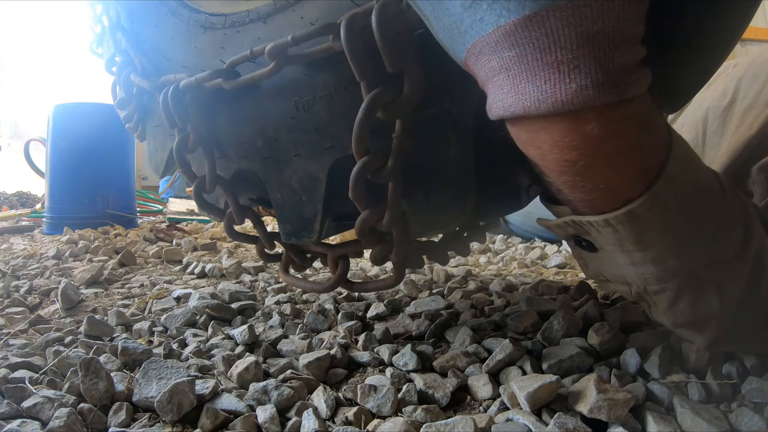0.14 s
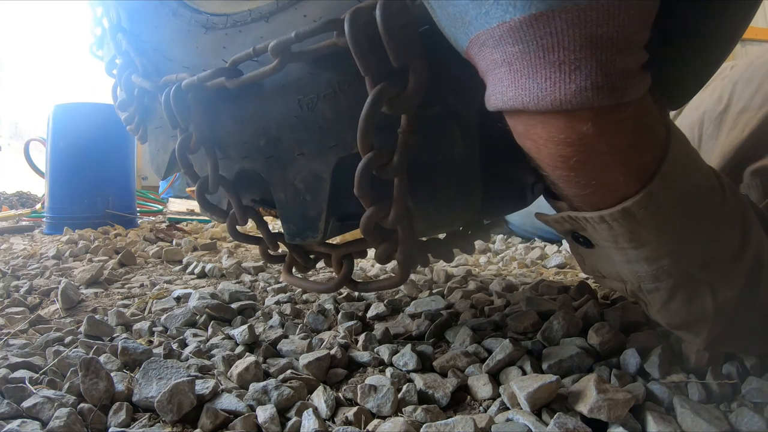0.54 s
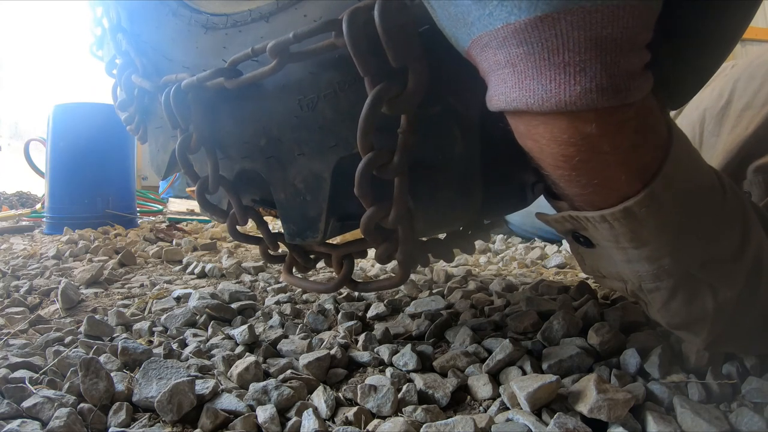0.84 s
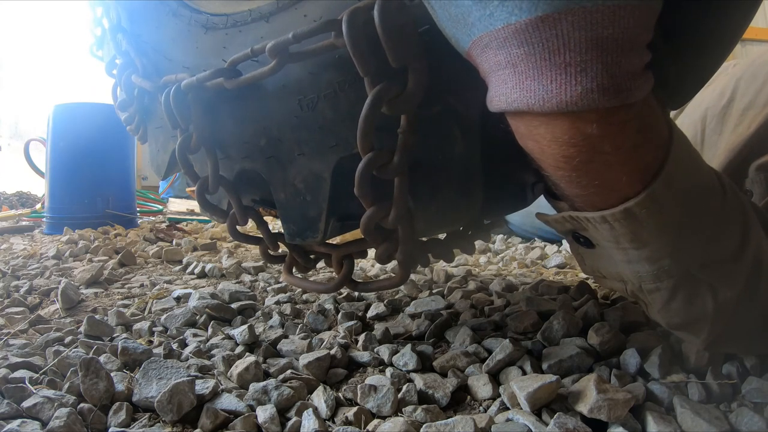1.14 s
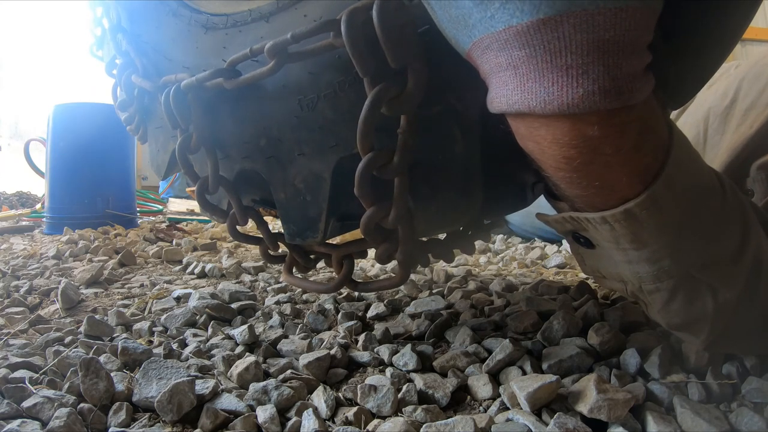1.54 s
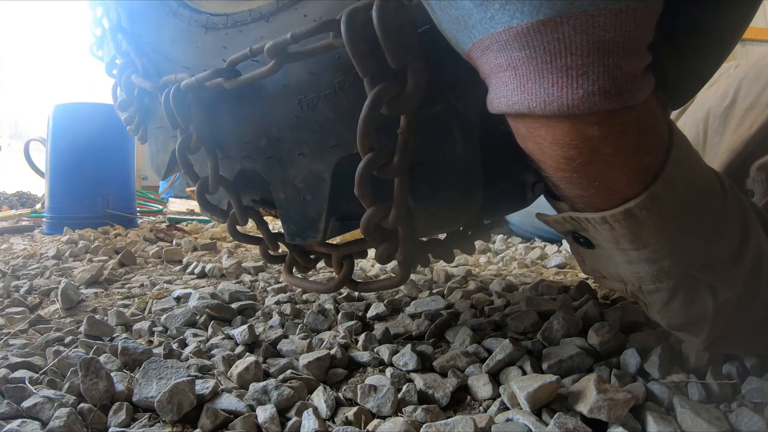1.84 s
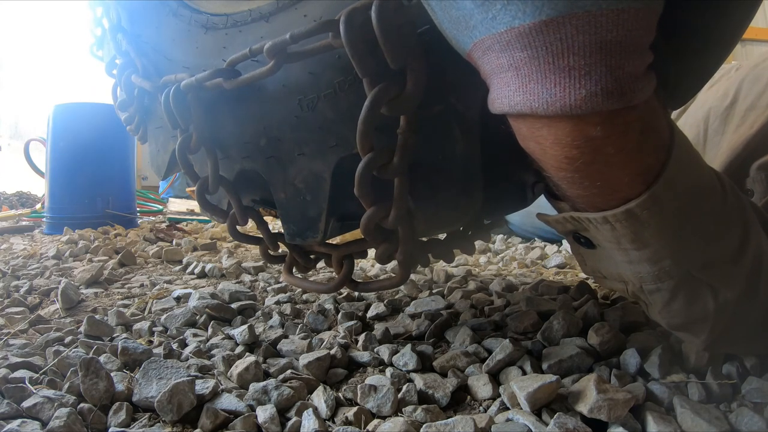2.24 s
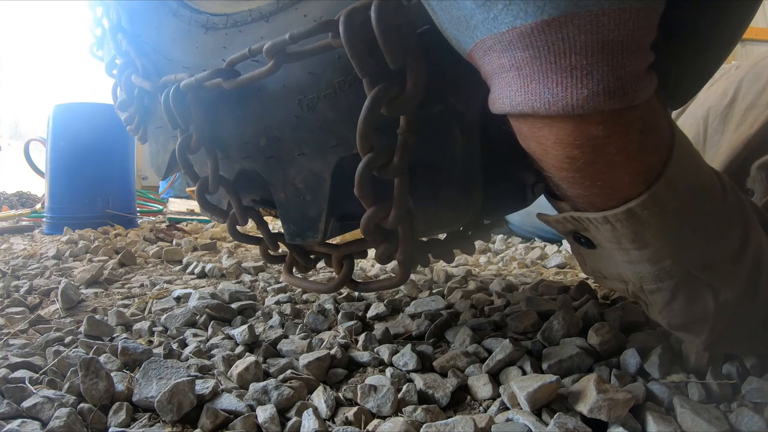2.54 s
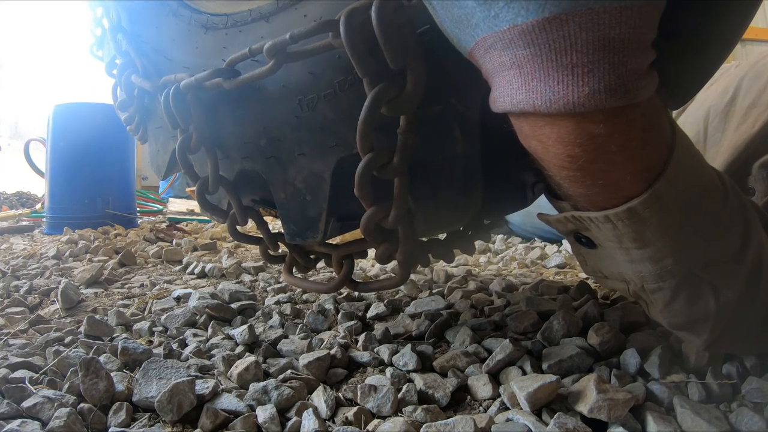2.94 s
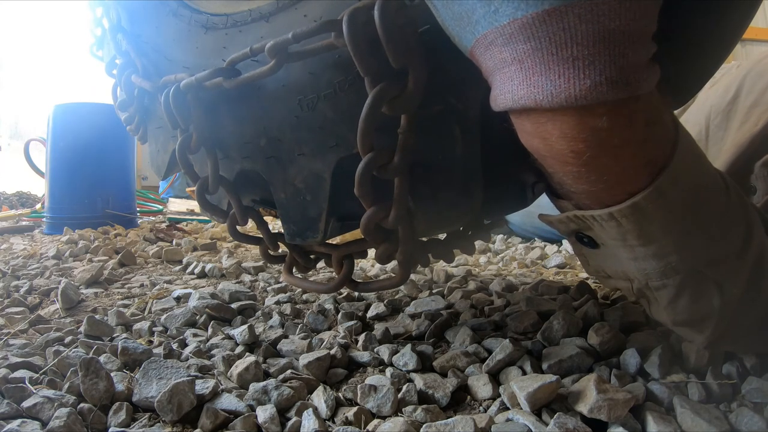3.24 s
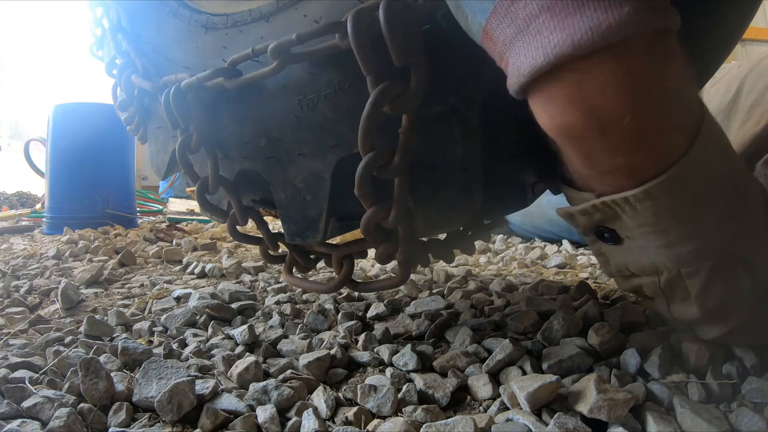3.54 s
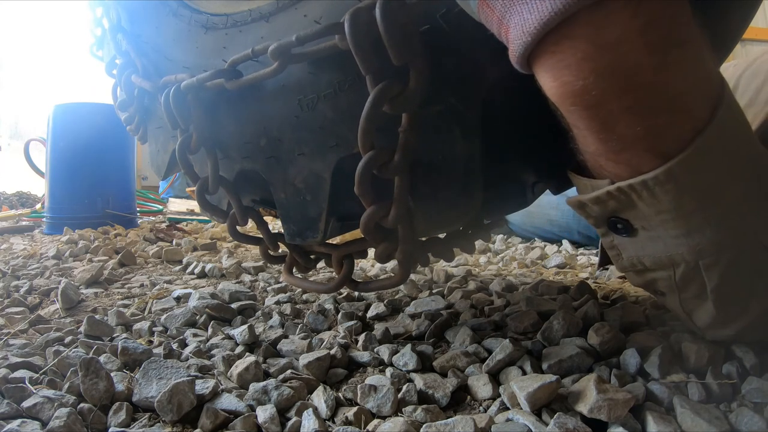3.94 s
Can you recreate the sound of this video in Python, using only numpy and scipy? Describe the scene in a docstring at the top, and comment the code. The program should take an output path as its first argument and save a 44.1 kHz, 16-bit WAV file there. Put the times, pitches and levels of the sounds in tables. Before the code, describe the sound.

A heavy steel chain is tugged over a tractor tyre, clinking brightly and rattling, with one loud ringing knock, then only dull rubbing and grit.

```python
"""A heavy steel chain, tugged by hand over a tractor tyre: links knock and ring in decaying modes.
Under the glove they jostle, random touches on short resonances; sliding, they sing in narrow modes fed by slips.
Chain on rubber, cloth and grit rub as banded noise and crackle; dry ticks are noise bursts.
A low outdoor rumble with a hum wavers underneath, as slowly varying noise, over a steady hiss.
Heard in stereo, close by, as from a small recorder lying on gravel."""
import sys
import numpy as np
from scipy import signal
from scipy.io import wavfile

SR = 44100
rng = np.random.default_rng(int(sys.argv[2]) if len(sys.argv) > 2 else 0)


def unload_audio(sound):
    """Save the sound as a 16-bit wav file, at the path given as the first command line argument."""
    columns = np.transpose(np.atleast_2d(sound))
    # keep every value between -1 and 1, then stretch to whole-number steps
    steps = np.round(np.clip(columns, -1, 1) * 32767)
    wavfile.write(sys.argv[1], SR, steps.astype(np.int16))


N = 180750

# Link on link. Each row: start in seconds, drive in dB of free ring, short clink, upper clink, low clink,
# dull knock and deep ring, pitch of the pinched link in Hz, seconds until a touch chokes the ring, left-right in dB.
KNOCK_EVENTS = [(0.4347, -34.5, -48, -38, -58, -48, -60, 7150, 0.12, 3),
                (0.4679, -42, -53, -41, -70, -56, -59, 7150, 0.092, 6),
                (0.5086, -38, -54, -52, -63, -47, -60, 7240, 0.15, 2),
                (0.7428, -36, -43, -53, -55, -43, -47, 7150, 0.069, 0.1),
                (0.793, -20, -16.5, -16.5, -37, -22.5, -56, 7150, 0.076, 4.5),
                (0.797, -29, -17, -23, -30, -36, -51, 7040, 0.11, -4.5),
                (0.9336, -23, -29, -25, -55, -33, -55, 7240, 0.073, 6.5),
                (1.004, -30, -45, -57, -75, -60, -65, 7100, 0.18, 4),
                (1.4763, -8.5, -10.5, -25, -23, -20, -31, 7096, 0.11, 2),
                (1.6221, -57, -36, -30, -21, -29.5, -50, 7010, 0.14, -1),
                (1.7566, -47.5, -41, -50, -57, -42, -65, 7080, 0.11, 2),
                (1.8636, -26, -40, -40, -58, -43, -65, 7150, 0.064, 0),
                (1.9619, -33.5, -34.5, -48, -59, -44, -53, 6950, 0.02, 8),
                (2.0593, -29, -43, -36, -38.5, -33.5, -53, 7120, 0.031, 1),
                (2.089, -53, -44, -60, -39, -50, -60, 7150, 0.04, 0.1),
                (2.2456, -57, -51, -56, -50, -52, -74, 7160, 0.1, 0),
                (2.3201, -37, -45, -52, -45, -44, -44.5, 7100, 0.088, 3),
                (2.361, -38, -33, -42, -60, -52, -65, 7150, 0.05, 1.5),
                (2.3785, -22, -12, -25, -46, -33, -60, 7140, 0.05, 2),
                (2.529, -34.5, -60, -57, -78, -65, -74, 7300, 0.035, 3),
                (2.539, -38.5, -37.5, -53, -63, -65, -68, 7080, 0.06, 0.5),
                (2.6984, -55, -42, -56, -61.5, -52, -75, 7200, 0.11, 2),
                (2.765, -67, -55, -50, -58, -57, -76, 7240, 0.1, 0.1),
                (3.1375, -61, -50, -45, -54.5, -47.5, -76, 7300, 0.1, 2.5),
                (3.1686, -55, -46, -46, -65, -48, -64, 7150, 0.11, 7),
                (3.1898, -59, -52, -42.5, -51, -41.5, -65, 7300, 0.091, 3),
                (3.2461, -72, -56, -44, -69, -34, -63, 7230, 0.11, 1),
                (3.2855, -55, -52, -48, -52, -43, -69, 7300, 0.12, 3),
                (3.501, -44, -45, -49, -57, -42, -66, 7300, 0.13, -4.5),
                (3.934, -49, -35, -40, -46, -25, -68, 7400, 0.11, 4),
                (3.989, -45, -44, -43, -62, -47, -64, 7200, 0.1, 6)]
# Link modes, a list for each family: free ring, short, second, upper, low and top clink, dull knock,
# deep ring. Each entry: frequency in Hz.
LINK_MODES_HZ = [
    [6950, 7020],
    [7150, 7260],
    [7330, 7385, 7610],
    [7790, 8020, 8393],
    [4780, 4530],
    [10550, 11130, 12800, 13430, 14290],
    [1400, 1950, 2600, 3150, 3480],
    [2780],
]
# The same modes. Each row: level in dB, undamped t60 in seconds.
LINK_MODES = [
    [(-1, 0.22), (-18.5, .15)],
    [(4.5, 0.075), (-13, 0.12)],
    [(0, 0.057), (-10, 0.1), (-10, 0.086)],
    [(0, 0.12), (-6, 0.11), (-19, 0.29)],
    [(1.5, 0.1), (-11.5, .12)],
    [(-2, 0.15), (-16, 0.046), (-15, .1), (-12, .09), (-20, .12)],
    [(-0.5, 0.0071), (-16, 0.0037), (-5.5, 0.053), (-9.5, 0.041), (-0.5, 0.023)],
    [(-9, 0.5)],
]
# Pitch spread between links. Each entry, one a family: share of the frequency.
PITCH_SPREAD = [.001, .001, .003, .002, .004, .002, .035, .002]
# Drive of each family. Each entry: index of the drive column in KNOCK_EVENTS, from 0 = free ring.
DRIVE_COLUMN = [0, 1, 2, 2, 3, 1, 4, 5]
# Family level against its drive. Each entry: level in dB.
FAMILY_LEVEL_DB = [0, 0, 1.5, -2.5, 0, -24, 0, 0]
# Stereo phase. Each row: frequency in Hz, lead of the left port in radians.
LEFT_LEAD = [(1500, 0.098), (4700, .2), (6900, 0.43), (8000, 1.7), (12000, 2.2)]
# Links under the glove. Each entry: mode frequency in Hz.
JOSTLE_MODES_HZ = [7080, 7300, 7600]
# Modes sung by sliding links. Each entry: frequency in Hz.
SUNG_MODES_HZ = [6940, 7770, 8390, 12800, 14270]
# The same modes. Each row: level in dB, t60 in seconds.
SUNG_MODES = [(2, 0.1), (2.5, 0.33), (0.5, 0.14), (-32, 0.083), (-34, 0.069)]
# Sliding. Each row: time in seconds, levels in dB of the first, second and third sung mode.
SING_LEVELS = [(0.0, -80, -80, -88), (0.22, -67, -92, -90), (0.366, -51.5, -74, -55),
               (0.48, -47.5, -42, -74), (0.56, -44.5, -63, -76), (0.67, -45, -61, -67),
               (0.76, -48, -68, -64), (0.82, -58, -68, -56), (0.885, -33, -62, -53), (0.91, -50, -57, -65),
               (1.1, -63, -73, -81), (1.168, -53, -67, -71), (1.252, -61, -66, -76), (1.33, -48, -66, -62),
               (1.44, -50, -63, -60.5), (1.52, -65, -78, -80), (1.64, -46, -54, -70), (1.69, -77, -95, -98),
               (1.8, -62, -72, -82), (1.88, -44, -57, -58), (1.996, -52, -61, -68),
               (2.074, -45.5, -57, -68), (2.168, -65, -80, -92), (2.335, -53.5, -50, -62),
               (2.44, -56, -70, -72), (2.5, -88, -90, -98), (2.574, -47.5, -74, -69), (2.78, -68, -68, -81),
               (2.84, -90, -98, -100), (4.1, -110, -120, -120)]
# Rubbing strokes. Each row: peak in seconds, rise over the last 10 dB in seconds, fall by 10 dB in seconds,
# chain on rubber in dB, cloth in dB, bright grit (before its top is thinned) in dB.
RUB_STROKES = [(0.17, .3, .06, -58, -63, -57), (0.425, .08, .06, -47, -52, -47),
               (0.53, .04, 0.0357, -50, -61, -47), (0.64, .06, .09, -45, -52, -44),
               (0.775, .025, .012, -44, -51, -41), (0.903, .025, .014, -47.5, -50.5, -45.5),
               (0.96, .015, .08, -56, -63, -54), (1.148, .3, .016, -54, -63, -53),
               (1.202, .016, .02, -55.5, -65, -56), (1.33, .035, .035, -47, -54, -46.5),
               (1.44, .04, .018, -55.5, -53.5, -59), (1.497, .012, .007, -47, -65, -46),
               (1.558, .06, .025, -62, -65, -63), (1.635, .025, .015, -54, -56, -48),
               (1.74, .06, .08, -53.5, -65.5, -55), (1.866, .035, .02, -47, -59, -50.5),
               (1.934, .024, .012, -50, -62, -49.5), (1.962, .008, 0, -49.5, -47.5, -52.5),
               (2.068, .05, .11, -53, -67, -53), (2.35, .2, .03, -58.5, -57, -54),
               (2.39, .02, .012, -45.5, -53, -38), (2.442, .03, .013, -54, -54, -44),
               (2.56, .035, .3, -61, -64, -60), (2.704, .08, 0.016, -59, -63, -53),
               (2.85, .2, .1, -71, -71, -62.5), (2.974, .025, .025, -57.5, -62, -56),
               (3.195, .055, .02, -61.5, -60, -66), (3.248, .007, .08, -58.5, -58, -56),
               (3.34, .025, .028, -57, -52, -55), (3.48, .045, .2, -56, -53.5, -53),
               (3.645, .1, .025, -53, -60, -53), (3.93, .4, .3, -56, -53.5, -49),
               (3.936, .012, .02, -48, -47, -45), (4.088, .008, .008, -53, -56, -49)]
# Chain on rubber. Each row: frequency in Hz, relative density in dB per Hz.
DRAG_SPECTRUM = [(1060, -40.5), (1800, -8), (1950, 0.5), (2110, -10.5), (2720, 1.5), (4800, -12),
                 (6240, -55), (10600, -120)]
# A link slips on rubber or grit cracks. Each row: start in seconds, level in dB, body frequency in Hz.
TICK_EVENTS = [(0.584, -44, 2830), (0.605, -30, 2880), (0.615, -37, 1690), (0.625, -31, 2900),
               (0.66, -27, 3120), (0.709, -34, 2680), (0.899, -37, 2100), (0.976, -37, 3230),
               (1.15, -35.5, 1990), (1.204, -47.5, 1870), (1.312, -42, 2560), (1.917, -34, 2580),
               (1.93, -33, 3220), (2.185, -53, 960), (2.284, -36.5, 1810), (2.358, -33.5, 1290),
               (2.362, -30, 3630), (2.422, -40, 3500), (2.437, -40.5, 1910), (2.445, -39, 3500),
               (2.559, -42, 1790), (2.677, -40, 3530), (2.974, -49, 1300), (3.334, -36.5, 1940),
               (3.343, -37, 2140), (3.686, -47, 860), (3.722, -41, 1290), (3.896, -43, 1480),
               (4.048, -43.5, 1460), (4.082, -40.5, 3070)]
# Sleeve and glove. Each row: frequency in Hz, relative density in dB per Hz.
CLOTH_SPECTRUM = [(260, -45), (450, -15.5), (874, -3.5), (959, -9), (1310, 2), (2200, -8.5), (2860, -15.5),
                  (4840, -120)]
# Bright grit. Each row: frequency in Hz, relative density in dB per Hz.
GRIT_SPECTRUM = [(2650, -37.5), (4500, -5.5), (5420, -15), (6090, -3), (7570, 2.5), (8290, -9), (8880, -12),
                 (9870, -9.5), (11400, -32), (13900, -41), (14800, -33), (15500, -56), (16000, -59)]
# Outdoor rumble. Each row: frequency in Hz, relative density in dB per Hz.
RUMBLE_SPECTRUM = [(13, -58.5), (22, -33), (91, 0.5), (124, -5.5), (178, 0.5), (198, -3.5), (248, -6.5),
                   (300, -10.5), (340, -20), (600, -34.5), (780, -56), (1320, -120)]
# Rumble level. Each row: time in seconds, level in dB.
RUMBLE_SWELL = [(0.0, -54), (0.11, -50.5), (0.78, -52.5), (1.07, -60), (1.19, -51.5), (1.3, -56.5),
                (1.49, -53.5), (1.6, -60), (1.88, -60), (1.96, -57), (2.86, -54.5), (2.97, -58.5),
                (3.32, -52.5), (3.6, -53.5), (3.95, -51.5), (4.1, -54.5)]
# Deep thuds of the tyre as the chain is tugged. Each row: peak in seconds, rise over the last 10 dB in seconds,
# fall by 10 dB in seconds, level in dB.
DEEP_HEAVES = [(0.01, 0.08, .06, -42.5), (0.79, .05, .12, -43), (1.48, .07, .04, -46.5),
               (1.95, 0.1, .13, -54.5), (2.43, .09, .4, -48), (3.32, .3, .2, -50.5), (3.85, .08, 0.02, -47),
               (4.09, 0.1, .08, -42.5)]
# Hum inside the rumble. Each row: frequency in Hz, width in Hz, mean level against the rumble in dB.
HUM_LUMPS = [(157.4, 11, -5.5), (188.3, 17, -7)]
# Steady hiss. Each row: frequency in Hz, relative density in dB per Hz.
AIR_SPECTRUM = [(240, -32), (400, 5.5), (503, -18.5), (847, -6.5), (1660, -30.5), (3210, -10),
                (6580, -36.5), (15500, -70)]
# Stereo likeness of banded noise. Each row: frequency in Hz, left-right correlation.
STEREO_LIKENESS = [(60, 0.89), (130, 0.92), (290, 0.92), (640, 0.064), (1410, 0.39), (3100, 0.86),
                   (6820, 0.42), (15000, 0.09)]

GRIP_S = 3.0   # from here the glove holds the links and they barely ring
GRIP_DECAY_SHARE, GRIP_SNAP_DB = 0.3, -7   # the glove softens the snap too
TYRE_DECAY_SHARE = 0.64   # of the free decay time, for links lying on the tyre
SNAP_DB, CHINK_DB = -2, -6.5   # snap against dull knock, chink against upper clink
JOSTLE_T60_S, JOSTLE_DB = 0.012, -7   # level against the grit
EDGE_DB, TICK_PAN_DB = -15, -1.2   # mean bright edge against the body, mean left-right
DEEP_DB, AIR_DB = -66, -67   # deepest rumble between tyre thuds, hiss
CUTOFF_HZ = 16600


def knocks():
    """Each knock sets all link modes ringing, family by family, until a neighbouring link chokes them."""
    out = np.zeros((2, N))
    t = np.arange(int(0.25 * SR)) / SR
    family = np.concatenate([[k] * len(modes) for k, modes in enumerate(LINK_MODES)])[:, None]
    mode_hz = np.concatenate(LINK_MODES_HZ)[:, None]
    mode_db, t60_s = np.concatenate(LINK_MODES).T[:, :, None]
    chance = rng.standard_normal((len(KNOCK_EVENTS), 3, len(family), 1))
    rattle = drift(54.0)
    attack = np.sin(np.pi / 2 * np.minimum(t / 0.00076, 1)) ** 2
    for (s, *drive_db, short_hz, held_s, pan_db), (detune, strength, lag) in zip(KNOCK_EVENTS, chance):
        gripped = s > GRIP_S
        hz = mode_hz * (1 + np.array(PITCH_SPREAD)[family] * detune)
        # the pinched link sets its own pitch
        hz = hz * np.where(family == 1, short_hz / LINK_MODES_HZ[1][0], 1)

        family_db = np.array(drive_db)[DRIVE_COLUMN] + FAMILY_LEVEL_DB
        level_db = family_db[family] + mode_db + 1.7 * strength * (family > 1)
        # the free ring hangs clear of the tyre
        decay_share = np.where(family > 0, TYRE_DECAY_SHARE, 1)
        decay_share = decay_share * (GRIP_DECAY_SHARE if gripped else 1)
        decay = from_db(-60 * t / (t60_s * decay_share))

        # loose neighbours make each ring but the free one flutter
        rattle_at = rng.integers(0, N - len(t), family.shape) + np.arange(len(t))
        chatter = from_db(3.0 * (family > 0) * rattle[rattle_at])
        choke = 1 / (1 + np.exp(np.minimum((t - held_s) / 0.0043, 50)))
        envelope = from_db(level_db) * decay * chatter * choke * attack

        half_lead_rad = (at_hz(LEFT_LEAD, hz) + 0.59 * lag) / 2
        phase_rad = 2 * np.pi * hz * t
        left = (envelope * np.sin(phase_rad + half_lead_rad)).sum(axis=0)
        right = (envelope * np.sin(phase_rad - half_lead_rad)).sum(axis=0)
        add(out, s, np.array([left, right]), pan_db)

        snap_db = drive_db[4] + SNAP_DB + GRIP_SNAP_DB * gripped
        add(out, s, from_db(snap_db) * burst(1500, 8500, 0.0038), pan_db)
        # many links jolted at once blur into a chink
        chink_db = drive_db[2] + CHINK_DB
        add(out, s, from_db(chink_db) * burst(6500, 8400, 0.0066), pan_db)
    return out


def jostle(grit_db):
    """Links under the glove touch at random and barely ring: crackle through short resonances."""
    touches = bandpass(grains(200.0, 3.0, channels=2), 6500, 8200)
    pole_radius = from_db(-60 / (JOSTLE_T60_S * SR))
    rings = sum(resonate(touches, hz, pole_radius) for hz in JOSTLE_MODES_HZ)
    blended = rms_one(rings + 0.6 * rings[::-1])
    gripped = np.arange(N) / SR > GRIP_S
    return from_db(grit_db + JOSTLE_DB + 3.0 * drift(12.0)) * blended * gripped


def sliding():
    """Rusty links grind: soft uneven slips keep narrow modes singing, the top ones coming and going."""
    out = 0
    levels_db = in_time(SING_LEVELS)
    for k, (hz, (mode_db, t60_s)) in enumerate(zip(SUNG_MODES_HZ, SUNG_MODES)):
        # the top two follow the first, with a drift of their own
        level_db = levels_db[k] if k < len(levels_db) else levels_db[0] + 3.5 * drift(8.0)
        slips = bandpass(grains(400.0, 2.5, channels=2), hz - 200, hz + 200)
        near, far = resonate(slips, hz, from_db(-60 / (t60_s * SR)))
        late = np.roll(near, 1)   # the right port hears it a sample later
        pair = np.array([1.08 * near + 0.15 * far, 0.72 * late - 0.2 * far])
        out = out + from_db(mode_db + level_db) * pair
    return out


def chain_on_rubber(level_db):
    """Chain dragged over the tyre: coarse crackle over noise."""
    return rustle(DRAG_SPECTRUM, level_db, crackle=0.7)


def ticks():
    """Dry ticks without ring: a dull noise body and a bright edge."""
    out = np.zeros((2, N))
    chance = rng.standard_normal((len(TICK_EVENTS), 2))
    for (s, level_db, body_hz), (edge, pan) in zip(TICK_EVENTS, chance):
        body = burst(body_hz / 1.46, body_hz * 1.44, 0.0019)
        bright = from_db(EDGE_DB + 2.5 * edge) * burst(3000, 6800, 0.0037)
        add(out, s, from_db(level_db) * (body + bright), TICK_PAN_DB + 1.5 * pan)
    return out


def cloth(level_db):
    """Sleeve and glove rustle: light crackle over noise."""
    return rustle(CLOTH_SPECTRUM, level_db, crackle=0.41)


def bright_grit(level_db):
    """Bright crackle over noise, thinned in a step above 11 kHz by mixing in a low-passed copy."""
    grit = rustle(GRIT_SPECTRUM, level_db, crackle=0.4)
    thinned = signal.sosfilt(signal.cheby2(8, 40, 11400, fs=SR, output="sos"), grit)
    return 0.49 * grit + 0.89 * thinned


def outdoor_rumble():
    """Low banded noise wavers, with hum inside; the tyre thuds with each tug and lifts the deepest bands."""
    rumble_db, = in_time(RUMBLE_SWELL)
    heave_db, = swells(DEEP_HEAVES)
    deep_db = 20 * np.log10(from_db(heave_db) + from_db(DEEP_DB))
    noise = rng.standard_normal((2, N))
    rumble = banded(noise, RUMBLE_SPECTRUM, 1.8, 5.0, bass_db=deep_db - rumble_db)
    return from_db(rumble_db) * (rumble + hum())


def hum():
    """Narrow lumps of low noise that come and go: resonated noise under a slow drift."""
    out = 0
    for hz, width_hz, level_db in HUM_LUMPS:
        lump = resonate(rng.standard_normal(N), hz, np.exp(-np.pi * width_hz / SR))
        out = out + from_db(level_db + 2.34 * drift(3.3)) * lump
    return out


def air():
    """Nearly steady hiss: banded noise."""
    return from_db(AIR_DB) * banded(rng.standard_normal((2, N)), AIR_SPECTRUM, 0.13, 5.7)


def rustle(spectrum, level_db, crackle):
    """Rubbing: random clicks over fine noise, in flickering bands."""
    source = 0.51 * rng.standard_normal((2, N)) + crackle * grains(900.0, 3.2, channels=2)
    return from_db(level_db) * banded(source, spectrum, patchy_db=2.5, rate_hz=24.0)


def banded(source, spectrum, patchy_db, rate_hz, bass_db=0):
    """Third-octave bands of a mid and side source, each with its own level, flicker and likeness."""
    points = np.array(spectrum)
    edges_hz = points[0, 0] * 2 ** np.arange(0, 6, 1 / 3)
    edges_hz = edges_hz[edges_hz < min(points[-1, 0] * 1.1, 0.45 * SR)]
    out, power = 0, 0
    together = drift(rate_hz)
    for k, (low_hz, high_hz) in enumerate(zip(edges_hz, edges_hz[1:])):
        # every other band reads the source backwards, so neighbours are unrelated
        mid, side = bandpass(source[:, ::(-1) ** k], low_hz, high_hz)
        hz = np.sqrt(low_hz * high_hz)
        alike = np.clip(at_hz(STEREO_LIKENESS, hz), 0, 1)
        band = np.sqrt(1 + alike) * mid + np.sqrt(1 - alike) * side * [[1], [-1]]
        level_db = at_hz(spectrum, hz)
        power += np.mean(band ** 2) * from_db(2 * level_db)
        lift_db = bass_db * (hz < 125)
        flicker_db = patchy_db * (0.53 * together + drift(rate_hz))
        out = out + band * from_db(level_db + lift_db + flicker_db)
    return out / np.sqrt(power)


def swells(rows):
    """Each row climbs to its peak and falls evenly in dB; powers add. One level in dB per column."""
    t = np.arange(N) / SR
    power = 0
    for s, rise_s, fall_s, *peak_db in rows:
        drop_db = 10 * np.maximum((s - t) / rise_s, (t - s) / fall_s)
        power = power + from_db(2 * (np.array(peak_db)[:, None] - drop_db))
    return 10 * np.log10(power + 1e-12)


def burst(low_hz, high_hz, fade_s):
    """A few ms of dying noise in a band; peak 1."""
    t = np.arange(int(0.02 * SR)) / SR
    dying = np.exp(-t / fade_s) * rng.standard_normal(len(t))
    noise = bandpass(dying, low_hz, high_hz, order=3)
    return noise[None] / np.abs(noise).max()


def grains(per_s, spread_db, channels):
    """Random clicks of uneven size and sign; rms 1."""
    shape = (channels, N)
    size_db = spread_db * np.minimum(rng.exponential(1, shape), 5)
    clicks = from_db(size_db) * rng.choice([-1, 1], shape)
    return rms_one(clicks * (rng.random(shape) < per_s / SR))


def drift(rate_hz):
    """Slow chance: noise at every 40th sample through a double one-pole low-pass; rms 1 before interpolation."""
    r = np.exp(-80 * np.pi * rate_hz / SR)
    noise = rng.standard_normal(N // 40 + 2002)
    slow = signal.lfilter([1], [1, -2 * r, r * r], noise)[2000:]   # settled part
    return np.interp(np.arange(N) / 40, np.arange(len(slow)), rms_one(slow))


def resonate(x, hz, pole_radius):
    """Two-pole resonance; rms 1."""
    r = pole_radius
    return rms_one(signal.lfilter([1], [1, -2 * r * np.cos(2 * np.pi * hz / SR), r * r], x))


def bandpass(x, low_hz, high_hz, order=2):
    """Butterworth band-pass."""
    return signal.sosfilt(signal.butter(order, [low_hz, high_hz], "band", fs=SR, output="sos"), x)


def add(out, s, pair, pan_db):
    """Mixes a short sound into both channels at s seconds."""
    at = round(s * SR)
    gains = from_db([[pan_db / 2], [-pan_db / 2]])
    out[:, at:at + pair.shape[-1]] += (gains * pair)[:, :N - at]


def in_time(rows):
    """Columns interpolated over time; the first column is seconds."""
    s, *columns = np.transpose(rows)
    return [np.interp(np.arange(N) / SR, s, column) for column in columns]


def at_hz(points, hz):
    """Value at hz, interpolated over log frequency."""
    points_hz, values = np.array(points).T
    return np.interp(np.log(hz), np.log(points_hz), values)


def from_db(db):
    """Amplitude from dB."""
    return 10 ** (np.asarray(db) / 20)


def rms_one(x):
    """Scales to rms 1 over all channels."""
    return x / np.sqrt(np.mean(x ** 2) + 1e-20)


def scene():
    """Sums chain, hand, rumble and hiss."""
    drag_db, cloth_db, grit_db = swells(RUB_STROKES)
    chain = knocks() + jostle(grit_db) + sliding() + chain_on_rubber(drag_db) + ticks()
    hand = cloth(cloth_db) + bright_grit(grit_db)
    return chain + hand + outdoor_rumble() + air()


def record(dry):
    """The highest peaks are rounded, the top is cut steeply."""
    rounded = dry / (1 + np.abs(dry / 0.9) ** 6) ** (1 / 6)
    return signal.sosfilt(signal.cheby2(12, 60, CUTOFF_HZ, fs=SR, output="sos"), rounded)


dry = scene()
out = record(dry)
unload_audio(out)
```